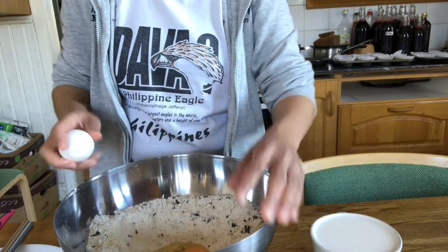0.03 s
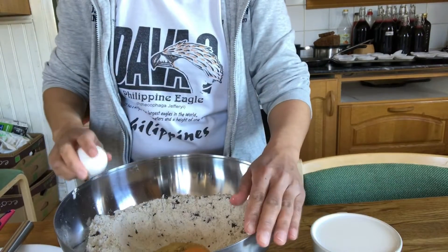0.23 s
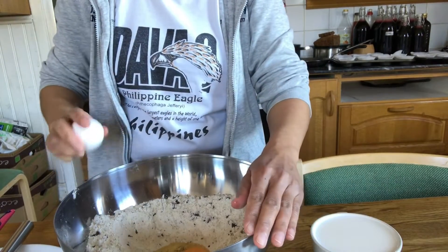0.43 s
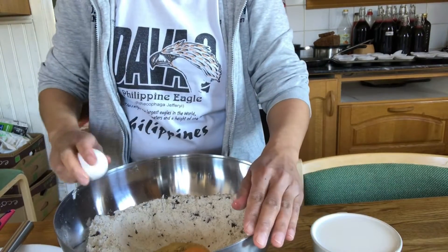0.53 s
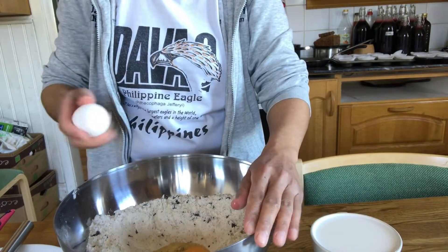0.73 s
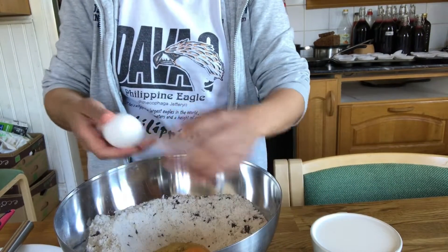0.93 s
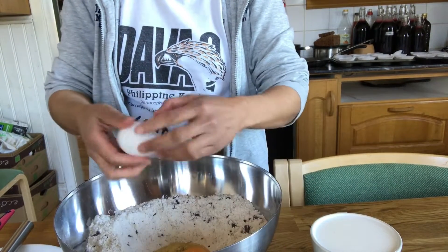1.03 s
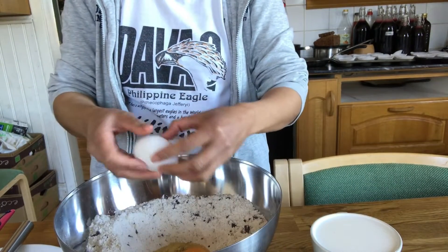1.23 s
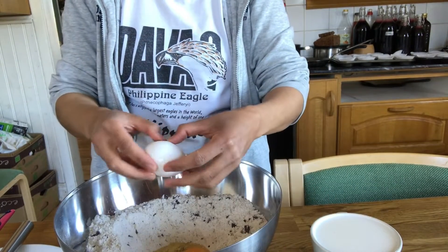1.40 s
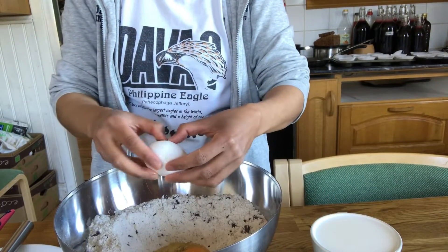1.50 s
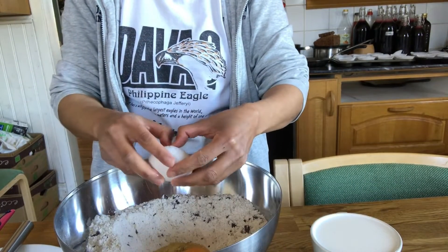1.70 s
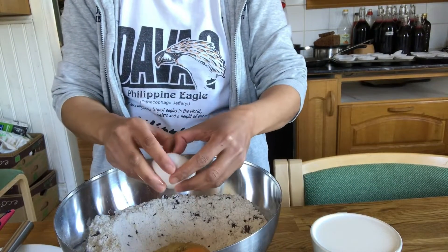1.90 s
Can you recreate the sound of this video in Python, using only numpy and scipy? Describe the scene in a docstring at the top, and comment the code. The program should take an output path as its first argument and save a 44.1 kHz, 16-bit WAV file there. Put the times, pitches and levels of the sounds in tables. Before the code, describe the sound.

An egg cracked on a steel mixing bowl is the main sound. First, fingers tap and rub the rim; at 0.3 seconds a hand lands with a hollow clunk, rattling the bowl on a wooden table. At about 0.55 seconds comes the loud crack, with a brief ring and thud. Faint shell ticks follow, clustering near 1.8 seconds. The kitchen echoes slightly over a faint appliance hum.

```python
"""First you hear fingers tap and slide on the rim of a steel mixing bowl full of flour. The hand settles on it
with a hollow clunk, and the bowl chatters on the wooden table. A few faint shell ticks lead in, then comes the
loudest sound, an egg struck once on the rim: the shell snaps, the held bowl rings briefly and the table thuds.
Thumbs pry the shell open with more faint ticks. Everything echoes a little in the kitchen, over the hum of an
appliance."""
import sys
import numpy as np
from scipy import signal
from scipy.fft import rfft, irfft
from scipy.io import wavfile

SR = 44100
rng = np.random.default_rng(int(sys.argv[2]) if len(sys.argv) > 2 else 0)


def output_pcm(signal):
    """Save a mono or channel-first signal as 16-bit PCM at the path in sys.argv[1].

    Samples are clipped to [-1, 1] before scaling.
    """
    pcm = np.clip(np.atleast_2d(signal).T, -1, 1) * 32767
    wavfile.write(sys.argv[1], SR, np.round(pcm).astype(np.int16))


N = 85995
SHARP_RISE_S = 0.00014  # how quickly a ping, clunk or tap reaches full strength


def amp(db):
    """Turns decibels into a number to multiply a sound by."""
    return 10 ** (np.asarray(db) / 20)


def look_up(points, hz):
    """Reads between the rows of a table, with frequency spaced in octaves."""
    frequencies, values = np.transpose(points)
    return np.interp(np.log(hz + 1), np.log(frequencies + 1), values)


def add(mix, start_s, sound):
    """Mixes a sound in at its start time."""
    part = mix[max(round(start_s * SR), 0):][:len(sound)]
    part += sound[:len(part)]


def shape(noise, tone, brightness=0):
    """Gives noise a tone, tilted by brightness (dB per octave), at an average (rms) strength of 1."""
    hz = np.fft.rfftfreq(len(noise), 1 / SR)
    octaves = np.log2((hz + 1) / 3000)
    gain = amp(look_up(tone, hz) + brightness * octaves)
    shaped = irfft(rfft(noise) * gain, len(noise))
    return shaped / np.sqrt(np.mean(shaped ** 2) + 1e-20)


def burst(tone, fade_s, brightness=0):
    """A click of dying noise. A fade time is how long a sound takes to drop by 60 dB."""
    t = np.arange(SR // 20) / SR
    return shape(rng.standard_normal(len(t)), tone, brightness) * amp(-60 * t / fade_s)


def ring(notes, rise_s):
    """A struck object's own notes swell, then fade; every other one starts by swinging the other way."""
    t = np.arange(SR) / SR
    waves = sum((-1) ** k * amp(db - 60 * t / fade_s) * np.sin(2 * np.pi * hz * t)
                for k, (hz, db, fade_s) in enumerate(notes))
    return waves * np.minimum(t / rise_s, 1)


# the shell giving way on the rim (time [s], level [dB])
SNAPS = [(0.5421, -16), (0.5432, -16.5), (0.5456, -22.5)]
# tone of a snap (frequency [Hz], relative level [dB])
SNAP_TONE = [(60, -21.5), (220, 2), (480, -18), (750, -3), (1200, -6), (1950, 2.5), (2800, -6.5),
             (3700, -5.5), (4500, -3), (6300, 1.5), (8000, -5), (11500, -12), (15500, -11.5)]
# small ticks of the shell (time [s], level [dB], fade time [s], brightness [dB per octave])
SHELL_TICKS = [(0.4522, -56.5, 0.0053, -3.5), (0.5078, -50.5, 0.0091, -3.5), (0.5303, -41.5, 0.035, -3),
               (0.5322, -46, 0.0077, -11), (0.7500, -45.5, 0.012, -0.5), (0.9505, -50.5, 0.0057, -5.5),
               (1.4335, -45, 0.0048, 7.5), (1.6450, -55, 0.0098, 8), (1.7655, -55.5, 0.0078, -3),
               (1.8313, -57.5, 0.015, 1), (1.836, -51.5, 0.0098, 1.5), (1.8473, -43.5, 0.0086, -1),
               (1.851, -48, 0.014, -1), (1.868, -68, .008, -7)]
# tone of a shell tick (frequency [Hz], relative level [dB])
SHELL_TONE = [(200, -20.5), (900, -7), (1700, 2), (3500, -4.5), (7000, 0), (10000, -14), (15000, -9.5)]
# the shell's own short ring as it splits (time [s], level [dB], pitch [Hz])
SHELL_PINGS = [(1.434, -50, 2546), (1.1582, -59.5, 2202), (1.7655, -64, 2200), (1.8382, -51, 1600),
               (1.8469, -50.5, 1506), (1.8520, -52.5, 1650)]

def egg():
    """A few faint ticks come just before the shell breaks in a quick run of snaps; more ticks and pings follow
    as it is pulled apart."""
    out = np.zeros(N)
    for start_s, db in SNAPS:
        add(out, start_s, amp(db) * burst(SNAP_TONE, fade_s=0.012))
    for start_s, db, fade_s, brightness in SHELL_TICKS:
        add(out, start_s, amp(db) * burst(SHELL_TONE, fade_s, brightness))
    for start_s, db, hz in SHELL_PINGS:
        add(out, start_s, ring([(hz, db, 0.011)], SHARP_RISE_S))  # one note, gone in 11 ms
    return out


# blows on the bowl (time [s], body level [dB], rim level [dB], table level [dB], contact time [s])
BLOWS = [(0.2832, -27.5, -46, -56, .002), (0.2880, -45.5, -40.5, -64, 0.0023),
         (0.3515, -48.5, -58.5, -55, 0.0025), (0.5423, -25.5, -14.5, -35.5, .0004)]
# low notes of the filled bowl (pitch [Hz], relative level [dB], fade time [s])
BODY_NOTES = [(210, -8, .2), (251, -7, .24), (285, -11, .16), (333, -13, .22), (486, -9, .08),
              (560, -14, .1), (668, 1, .045), (820, -9, .09), (1005, -12, .08), (1205, -7, .03)]
# high notes of the rim, cut short by the hand (pitch [Hz], relative level [dB], fade time [s])
RIM_NOTES = [(1390, -12, .03), (1915, 2, .015), (2305, -12, .035), (2650, -16, .03), (3203, -12, .024),
             (4465, -5, .014), (5490, -6, .014), (6097, -2, .037), (6425, -2, .028), (6980, -10, .033),
             (8300, -14, .017)]
# deep notes of the wooden table (pitch [Hz], relative level [dB], fade time [s])
TABLE_NOTES = [(47, -14, .7), (57, -7, .85), (84, -10, .55), (119, -5, .42), (134, -7, .38), (212, -12, .3),
               (251, -10, .3)]

def bowl():
    """The soft hand and the hard egg shake the bowl's body, its rim and the table by different amounts."""
    out = np.zeros(N)
    for start_s, body_db, rim_db, table_db, contact_s in BLOWS:
        body = amp(body_db) * ring(BODY_NOTES, contact_s)
        rim = amp(rim_db) * ring(RIM_NOTES, contact_s)
        thud = amp(table_db) * ring(TABLE_NOTES, rise_s=0.025)
        add(out, start_s, body + rim + thud)
    return out


# tone of the clunk under the palm (frequency [Hz], relative level [dB])
PALM_TONE = [(200, -9.5), (270, 0.5), (335, -6.5), (490, -0.5), (670, 0), (820, -8), (1200, -14.5)]

def palm(start_s=0.2832, db=-34, fade_s=0.05):
    """The landing palm sounds the bowl's low notes, which die quickly under it: a hollow clunk."""
    out = np.zeros(N)
    notes = [(hz, look_up(PALM_TONE, hz), fade_s) for hz, _, _ in BODY_NOTES]
    add(out, start_s, amp(db) * ring(notes, SHARP_RISE_S))
    return out


# fingers meeting the rim (time [s], level [dB], pitch [Hz], fade time [s],
# tick level compared with the tap [dB], tick brightness [dB per octave])
TAPS = [(0.0227, -47, 1933, 0.012, 6, 2.5), (0.0244, -39.5, 2407, .008, -21, 5),
        (0.0381, -23.5, 1950, 0.007, -5.5, 0.5), (0.0503, -25.5, 910, 0.019, -4, -1),
        (0.0695, -37, 1823, 0.014, -10.5, 0), (0.1288, -28.5, 1650, 0.012, -5.5, 0.5),
        (0.1497, -36, 1618, 0.018, -18.5, -2.5), (0.2226, -43.5, 2000, 0.0093, -11.5, -1.5),
        (0.2629, -27.5, 1869, 0.012, -15, -4.5), (0.2666, -23.5, 1899, 0.0061, -18, -3),
        (0.3510, -32.5, 1600, 0.0084, -3, 0.5)]
# notes of a tap (pitch [times the tap's], relative level [dB], fade time [times the tap's])
TAP_NOTES = [(.87, 2, 0.47), (1.01, 4, 1.0), (1.24, -4, 0.92), (1.62, -6, 0.75)]
# tone of a tap's tick (frequency [Hz], relative level [dB])
TICK_TONE = [(100, -17.5), (900, 4), (2900, 3), (4000, -7.5), (7000, -11), (10000, -20.5), (13000, -14),
             (16000, -22.5)]

def finger_taps(tick_fade_s=0.016):
    """Each finger meets the steel with a tick and a short, hollow ring."""
    out = np.zeros(N)
    for start_s, db, hz, fade_s, tick_db, brightness in TAPS:
        notes = [(hz * ratio, note_db, fade_s * share) for ratio, note_db, share in TAP_NOTES]
        add(out, start_s, amp(db) * ring(notes, SHARP_RISE_S))
        add(out, start_s, amp(db + tick_db) * burst(TICK_TONE, tick_fade_s, brightness))
    return out


# skin sliding on the steel (time [s], length [s], level [dB], brightness [dB per octave])
SLIDES = [(0.0, 0.044, -54.5, -0.5), (0.044, .09, -56, -3.5), (0.174, 0.074, -53, 0.5)]
# tone of a slide (frequency [Hz], relative level [dB])
SLIDE_TONE = [(100, -22), (280, -3.5), (550, -11), (900, -4.5), (1800, 2), (2900, -2), (4200, -16),
              (6500, -14), (10000, -27), (16000, -35.5)]

def finger_slides(slips_per_s=1500):
    """Skin moves over steel in many tiny, random slips that blur into a soft rub."""
    out = np.zeros(N)
    for start_s, length_s, db, brightness in SLIDES:
        slips = rng.standard_normal(N) * (rng.random(N) < slips_per_s / SR)
        rub = shape(slips, SLIDE_TONE, brightness)
        stroke = signal.windows.tukey(int(length_s * SR), 0.4)  # fades in, holds, fades out
        add(out, start_s, amp(db) * stroke * rub[:len(stroke)])
    return out


# the bowl knocking on the table (time [s], level [dB], brightness [dB per octave])
KNOCKS = [(0.2832, -31, -1.5), (0.2876, -32.5, 0), (0.2938, -36, -0.5), (0.2995, -37.5, -4.5),
          (0.3110, -37.5, -3), (0.3252, -41, -4.5)]
# tone of a knock (frequency [Hz], relative level [dB])
KNOCK_TONE = [(100, -15.5), (190, -8), (280, 5), (390, -4), (500, 8), (720, 6), (1000, 4.5), (1300, -9),
              (1950, 2.5), (2800, -9.5), (4000, -8.5), (5000, -15.5), (6300, -10), (8000, -22.5),
              (15000, -38.5)]

def bowl_chatter(fade_s=0.03, echo_db=3):
    """As the hand lands, the bowl's base rattles on the wood, dying away; each knock has its own echo."""
    out = np.zeros(N)
    for start_s, db, brightness in KNOCKS:
        knock = np.zeros(N)
        add(knock, start_s, amp(db) * burst(KNOCK_TONE, fade_s, brightness))
        out += knock + amp(echo_db) * kitchen_echo(knock)
    return out


# tone of the egg's crack on its way to the walls (frequency [Hz], relative level [dB])
THROWN_CRACK_TONE = [(60, -9.5), (210, 7.5), (450, -3.5), (700, 8), (1000, 3.5), (1950, 3.5), (3000, -2.5),
                     (4500, -4.5), (5400, -0.5), (6300, 7.5), (7000, 2), (8000, -8), (11000, -10.5),
                     (15500, -13)]

def crack_echo(directions=6, gain_db=-18):
    """The bowl throws the crack in many directions, and each comes back with its own echo."""
    out = np.zeros(N)
    crack_s = SNAPS[0][0]
    for _ in range(directions):
        thrown = np.zeros(N)
        add(thrown, crack_s, burst(THROWN_CRACK_TONE, fade_s=0.012))
        out += kitchen_echo(thrown)
    return amp(gain_db) * out


# how long the kitchen's echo lasts (frequency [Hz], fade time [s])
ECHO_FADES = [(100, 0.91), (300, .45), (1000, 0.45), (2500, .4), (6300, 0.42), (10000, 0.29), (16000, .27)]
# tone of the echo (frequency [Hz], relative level [dB])
ECHO_TONE = [(60, -5), (250, 1), (450, -2.5), (900, -2), (1900, -7), (3500, -7.5), (6300, -7),
             (10000, -9.5), (16000, -9)]

def kitchen_echo(sound, delay_s=0.001, build_s=0.0065):
    """Many bounces off the walls blur into a noisy tail in which the bass lasts longest."""
    hz, t, bands = signal.stft(rng.standard_normal(SR), SR, nperseg=256)
    fade_s = look_up(ECHO_FADES, hz)[:, None]
    tone = amp(look_up(ECHO_TONE, hz))[:, None]
    balance = np.sqrt(2 * np.log(1000) / (fade_s * SR))  # a longer fade adds no extra energy
    bands = bands * tone * amp(-60 * t / fade_s) * balance
    tail = signal.istft(bands, SR, nperseg=256)[1][:SR]
    swell = np.clip((np.arange(SR) / SR - delay_s) / build_s, 0, 1)
    return signal.fftconvolve(sound, tail * swell)[:N]


# steady notes of the appliance (pitch [Hz], level [dB])
HUM_NOTES = [(66, -78), (100, -63), (133, -80), (147.5, -69.5), (199, -77.5), (399, -78.5), (432, -82),
             (697, -82.5)]
# tone of the still room air (frequency [Hz], relative level [dB])
AIR_TONE = [(15, -70.5), (25, -38), (48, -16), (102, -6.5), (170, -13.5), (317, -11.5), (394, -17),
            (641, -19), (695, -21.5), (754, -20.5), (887, -18), (1520, -24), (16000, -42)]

def hum_and_air(air_db=-66):
    """An appliance hums on a few steady notes over the faint, low rush of the room."""
    t = np.arange(N) / SR
    hum = sum(amp(db) * np.sqrt(2) * np.sin(2 * np.pi * (hz * t + rng.random()))
              for hz, db in HUM_NOTES)
    return hum + amp(air_db) * shape(rng.standard_normal(N), AIR_TONE)


def scene():
    """Fingers, bowl and egg, each sending its own share of sound into the kitchen's echo."""
    fingers = finger_taps() + finger_slides()
    steel = bowl() + palm()
    shell = egg()
    echo = kitchen_echo(amp(-4.5) * fingers + amp(-12.5) * steel + amp(-5) * shell)
    mix = shell + steel + fingers + echo + bowl_chatter() + crack_echo() + hum_and_air()
    return mix[None]  # one channel


def record(dry):
    """Cuts away the very highest treble, above 16300 Hz."""
    treble_cut = signal.firwin(255, 16300, window=("kaiser", 8), fs=SR)
    return signal.oaconvolve(dry, treble_cut[None], "same")


dry = scene()
out = record(dry)
output_pcm(out)
```